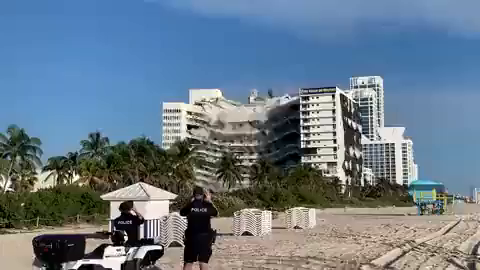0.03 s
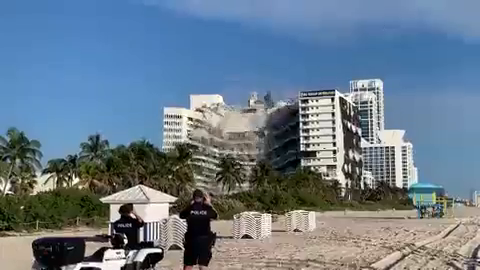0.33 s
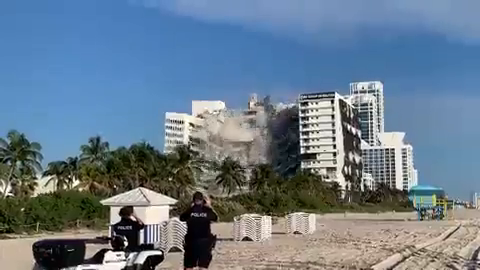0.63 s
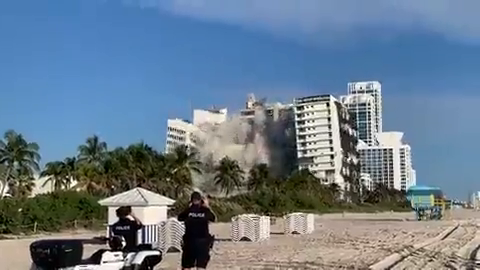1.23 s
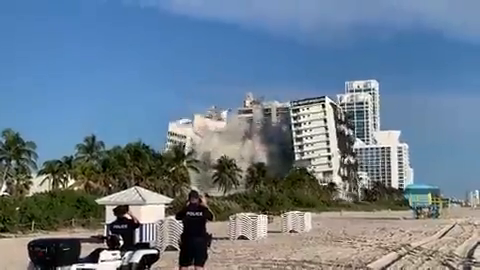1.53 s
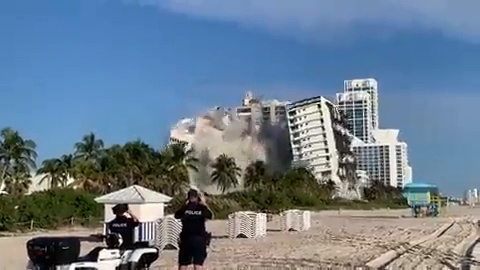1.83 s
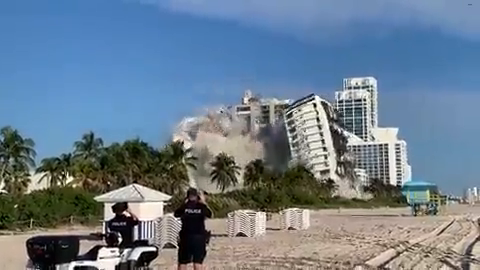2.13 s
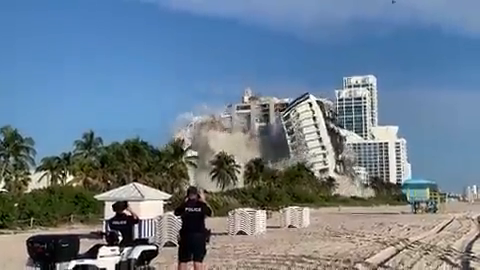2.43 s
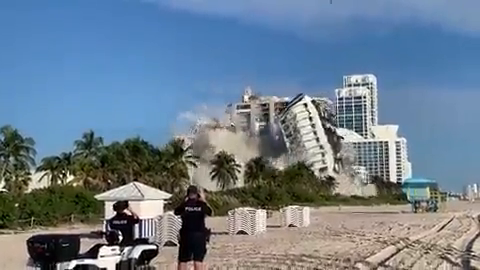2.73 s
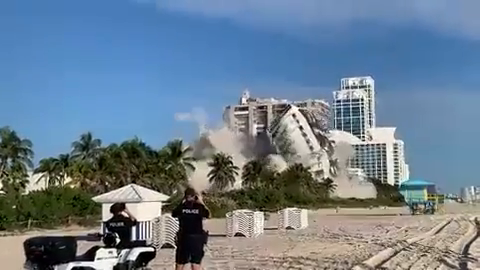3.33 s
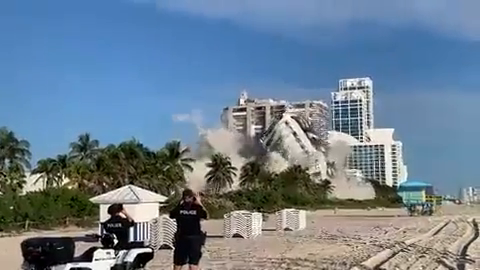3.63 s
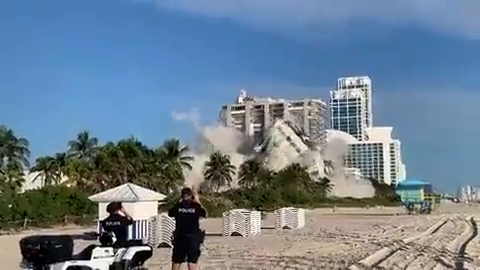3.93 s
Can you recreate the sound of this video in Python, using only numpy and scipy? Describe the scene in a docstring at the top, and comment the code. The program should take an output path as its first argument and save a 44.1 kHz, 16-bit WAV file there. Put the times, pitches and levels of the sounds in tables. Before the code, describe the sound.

A tall concrete building collapses, heard from a beach a few hundred metres away. Sharp cracks, crunching floors and heavy thuds cut through a roar of rubble, which then settles to a quiet rumble.

```python
"""Building collapse across a beach

A tall concrete building comes down a few hundred metres from a single microphone on the beach.
Countless rubble impacts merge into a roar, floors crunch and thud down, slabs knock on the heap and
members snap with sharp cracks. The path over the sand hollows out a few bands of the breaking and
falling debris; the fall then settles to a quiet rumble."""
import sys
import numpy as np
from scipy import signal
from scipy.fft import rfft, irfft
from scipy.io import wavfile
from scipy.ndimage import uniform_filter1d

SR = 44100
rng = np.random.default_rng(int(sys.argv[2]) if len(sys.argv) > 2 else 0)


def materialize(psi):
    """Save the field psi as 16-bit PCM at rate SR to the path in sys.argv[1].

    A 1-D psi becomes a single channel; in a 2-D psi each row is a channel.
    """
    bounded = np.clip(np.atleast_2d(psi).T, -1, 1)
    quanta = np.round(bounded * 32767).astype(np.int16)
    wavfile.write(sys.argv[1], SR, quanta)


N = 176400
TIME = np.arange(N) / SR


def undb(db):
    """Decibels to gain."""
    return 10 ** (np.asarray(db) / 20)


def unit(x):
    """Scale to rms 1."""
    return x / np.sqrt(np.mean(x ** 2))


def colour(x, *spectra, size=8192):
    """Causal filter of unit energy from one or more (f/Hz, level/dB) curves in series."""
    log_hz = np.log(np.maximum(np.arange(size // 2 + 1) * SR / size, 1))
    db = sum(np.interp(log_hz, np.log(s[:, 0]), s[:, 1]) for s in map(np.array, spectra))
    cepstrum = irfft(np.log(undb(db)))
    cepstrum[1:size // 2] *= 2  # fold to minimum phase
    cepstrum[size // 2 + 1:] = 0
    response = irfft(np.exp(rfft(cepstrum)))
    return signal.fftconvolve(x, response / np.linalg.norm(response))[:N]


def lowpass(x, hz):
    """Gentle first-order treble cut."""
    return signal.sosfilt(signal.butter(1, hz, fs=SR, output="sos"), x)


def wander(per_s):
    """Smooth random wander of rms 1."""
    hold = int(SR / per_s)
    steps = rng.standard_normal(N)[np.arange(N) // hold]
    return unit(uniform_filter1d(steps, hold))


def impacts(per_s, spread_db):
    """Randomly timed blows of rms 1; with no spread they are all the same size."""
    hits = rng.random(N) < per_s / SR
    sizes = undb(spread_db * np.minimum(rng.exponential(size=N), 4))
    return unit(hits * sizes * np.sign(rng.standard_normal(N)))


def burst(decay_s, size=22050):
    """Dying noise of unit energy."""
    x = rng.standard_normal(size) * np.exp(-np.arange(size) / SR / decay_s)
    return x / np.linalg.norm(x)


# Spectrum of the open air at the microphone: f/Hz, level/dB (levels in all tables are relative)
AIR_SPECTRUM = [(200,-6),(2500,-2.5),(4500,-5),(7000,-12.5),(9000,-32)]
def beach_air():
    """Faint steady hiss of the beach, under the fall."""
    return undb(-69) * colour(rng.standard_normal(N), AIR_SPECTRUM)


# Response of a few hundred metres of beach, building to microphone: f/Hz, level/dB
SAND_PATH = [(40,-39.5),(100,-11),(125,-24.5),(165,-7),(240,0.4),(300,-0.5),(370,-1),(490,-6.5),(560,-22),(620,-9.5),(675,-4.5),(790,-11.5),(885,-8),(1000,-11.5),(1080,-24),(1130,-15),(1230,-16.5),(1350,-12.5),(1600,-13),(1980,-16.5),(2170,-24.5),(2300,-15.5),(2450,-16.5),(2950,-21.5),(3600,-25),(4100,-28.5),(4450,-25.5),(4700,-34),(4950,-33),(5350,-39),(6550,-41),(7100,-42),(7650,-53),(8100,-45),(9500,-67.5)]
def over_sand(x, spectrum):
    """Give a source its own spectrum and the hollow bands of the path over the sand."""
    return colour(x, SAND_PATH, spectrum)


# Course of the fall from the beach: t/s, rumble level/dB, roar level/dB, clatter level/dB
FALL_LEVELS = [(0,-39.5,-15.5,-26),(.2,-31.5,-14.5,-32),(.39,-31,-14.5,-29.5),(.47,-29,-18,-41),(.6,-30,-18,-33.5),(.8,-34,-16,-31),(1.15,-32.5,-18.5,-32.5),(1.4,-32.5,-20,-30),(1.49,-36,-20.5,-35.5),(1.7,-32.5,-24,-32.5),(2.0,-39,-21,-31),(2.2,-45,-25.5,-35),(2.45,-41,-27,-36.5),(2.8,-51,-31.5,-47),(3.05,-52,-34.5,-53),(3.5,-56.5,-38,-48),(4,-52.5,-39,-51)]
def fall_gain(layer):
    """Gain over time of one layer as the building comes down and settles."""
    times, rumble_db, roar_db, clatter_db = np.array(FALL_LEVELS).T
    db = {"rumble": rumble_db, "roar": roar_db, "clatter": clatter_db}[layer]
    return undb(np.interp(TIME, times, db))


# Spectrum of the displaced air: f/Hz, level/dB
RUMBLE_SPECTRUM = [(15,-63.5),(25,-19.5),(45,-6),(62,3),(88,-7),(115,-20.5),(180,-39.5),(400,-84.5)]
def rumble():
    """The sinking mass pushes out air in a deep rumble."""
    return undb(5) * fall_gain("rumble") * unit(colour(rng.standard_normal(N), RUMBLE_SPECTRUM))


# Heavy masses landing: t/s, level/dB
LANDINGS = [(0.033,-28),(0.23,-9),(0.377,-14.5),(0.6,-14),(0.732,-14.5),(0.817,-13),(0.912,-10),(1.023,-20),(1.162,-18),(1.327,-21),(1.421,-16.5),(1.461,-21),(1.559,-16),(1.671,-16),(1.747,-19),(1.89,-18),(2.062,-14.5),(2.194,-22),(2.249,-19.5),(2.356,-24),(2.451,-29.5)]
def thuds(pitch_hz=65.4, width_s=0.013):
    """Each heavy landing sends out a short, low pressure pulse."""
    out = np.zeros(N)
    for middle, db in LANDINGS:
        hz = pitch_hz * (1 + 0.067 * rng.standard_normal())
        t = TIME - middle
        out += undb(db - 2.5) * np.exp(-(t / width_s) ** 2) * np.cos(2 * np.pi * hz * t)
    return out


# Slabs striking the heap: t/s, level/dB, low body level/dB
SLAB_HITS = [(.084,-26,7.5),(.168,-35,5),(0.223,-22.5,5.5),(.338,-27,6.5),(0.575,-21,7.5),(.668,-21.5,1.5),(0.763,-23,4.5),(0.91,-28,8),(1.044,-30,10.5),(1.152,-25,6),(1.171,-33,8),(1.267,-20,3),(1.283,-30,2),(1.408,-29,0),(1.532,-28.5,11.5),(1.578,-33,13),(1.73,-21,-10),(1.855,-35,12),(1.922,-19.5,4),(2.036,-27,0),(2.137,-27,5.5),(2.212,-32.5,8.5),(2.36,-31,8.5),(2.477,-30.5,4),(2.57,-28.5,-16),(2.704,-37,6.5),(3.178,-47.5,7),(3.288,-42,1),(3.529,-44,3)]
# Spectrum of a slab, before the sand: f/Hz, level/dB
SLAB_SPECTRUM = [(100,-2),(400,-3.5),(950,0.5),(1500,-3.5),(2200,-4.5),(4000,-15.5),(9000,-20)]
def slab_knocks(decay_s=0.021, body_hz=520):
    """A slab lands and crumbles: a dull, quickly dying run of blows; heavy slabs have more body."""
    force, body = np.zeros((2, N))
    for start, db, body_db in SLAB_HITS:
        landing = undb(db) * (TIME >= start) * np.exp(-np.maximum(TIME - start, 0) / decay_s)
        force += landing
        body += (undb(body_db) - 1) * landing
    blows = impacts(per_s=2200, spread_db=-1)
    return undb(2) * over_sand(force * blows + lowpass(body * blows, body_hz), SLAB_SPECTRUM)


# Floors breaking up: t/s, length/s, level/dB
FLOOR_FAILURES = [(0.151,0.049,-25),(0.24,0.042,-33),(0.35,0.047,-21.5),(0.483,0.039,-27),(0.533,0.065,-26.5),(0.641,0.022,-24.5),(0.722,0.052,-29.5),(0.826,0.024,-32),(0.9,0.024,-36),(1.088,0.047,-32.5),(1.25,0.069,-23),(1.409,0.017,-24.5),(1.521,0.022,-28.5),(1.905,0.025,-25),(2.026,0.019,-36),(2.34,0.017,-41)]
# Spectrum of their fragments, before the sand: f/Hz, level/dB
FRAGMENT_SPECTRUM = [(100,1),(400,1),(1200,0),(3000,3),(9000,8)]
def floor_crunches(attack_s=0.0019, release_s=0.015):
    """Each failing floor lets go a dense shower of fragments."""
    force = np.zeros(N)
    for start, length, db in FLOOR_FAILURES:
        rise = np.clip((TIME - start) / attack_s, 0, 1)
        fade = np.exp(-np.maximum(TIME - start - length, 0) / release_s)
        force += undb(db) * rise * fade
    return undb(1) * over_sand(force * impacts(per_s=1000, spread_db=0), FRAGMENT_SPECTRUM)


# Members snapping: t/s, level/dB, low body level/dB, splintering decay/s
MEMBER_SNAPS = [(0.01,-19,6,0.0025),(.024,-13,-5.5,.002),(0.056,-20,-10,.002),(.091,-18.5,2.5,.003),(0.146,-18.5,3.5,.003),(.162,-14,0,.003),(0.224,-12.5,0.5,0.0062),(.259,-19.5,-4.5,.002),(0.323,-18.5,6,0.0033),(.356,-20.5,6,0.0036),(.381,-19.5,1,.003),(.495,-23,-3,0.003),(0.544,-12.5,-3.5,0.0021),(.646,-15.5,6,0.0063),(.733,-12,-10,0.0036),(.751,-18,-4,.002),(.812,-11,-7.5,0.0031),(.836,-16.5,-5,.002),(.849,-25,-10,0.0022),(.907,-14.5,5.5,0.0051),(.923,-27.5,4,.002),(.957,-17,-11,0.0023),(1.008,-23,6,0.0022),(1.1,-27,11.5,.003),(1.243,-17.5,1.5,.002),(1.258,-22,0,0.0017),(1.276,-15.5,-15,0.0036),(1.295,-20,-3,0.0026),(1.31,-23.5,-3,0.0017),(1.41,-22,6,.005),(1.53,-13.5,2,0.0064),(1.536,-15.5,-3,0.0042),(1.592,-22.5,2,.003),(1.682,-25.5,1.5,0.0024),(1.72,-19.5,0,0.0055),(2.029,-17,2.5,0.0044),(2.042,-23.5,5,0.0043),(2.166,-17,-17,0.0035),(2.198,-31,-8,.002),(2.215,-18,-16,.004),(2.347,-17,-3.5,0.0036),(2.428,-35,7,0.0022),(2.569,-33.5,7,.004)]
# Spectrum of a snap, before the sand: f/Hz, level/dB
SNAP_SPECTRUM = [(100,-5),(500,-2),(1200,2),(3000,4),(5000,3),(9000,5.5)]
def member_cracks(ring_hz=3200, ring_q=5.8, highest_hz=9550, body_hz=1680):
    """A member snaps: a shock, splintering, a short tail and a brief ring; thin ones have less body."""
    out = np.zeros(2 * N)
    for start, db, body_db, splinter_s in MEMBER_SNAPS:
        snap = undb(3) * burst(splinter_s) + undb(-6) * burst(decay_s=0.008)
        snap[0] += 1  # the shock
        own_hz = min(ring_hz * np.exp(0.36 * rng.standard_normal()), highest_hz)
        snap += undb(-1) * signal.lfilter(*signal.iirpeak(own_hz, ring_q, fs=SR), snap)
        snap += (undb(body_db) - 1) * lowpass(snap, body_hz)
        onset = int(start * SR)
        out[onset:onset + len(snap)] += undb(db + 14.5) * snap
    return over_sand(out[:N], SNAP_SPECTRUM)


# Spectrum of big rubble, before the sand: f/Hz, level/dB
ROAR_SPECTRUM = [(100,0),(400,-1),(900,-2),(1600,-5.5),(3000,-5.5),(5000,-9.5),(9000,-26.5)]
# Spectrum of small rubble, before the sand: f/Hz, level/dB
CLATTER_SPECTRUM = [(100,-25),(500,-6.5),(900,1),(1400,-1),(2500,1),(5000,-0.5),(9000,5)]
def rubble(surge_db=1.26, settle_start_s=0.86, settle_length_s=0.74):
    """Big pieces roar and small ones clatter, surging together as the rubble falls unevenly."""
    surge = undb(surge_db * wander(per_s=26))
    big = unit(over_sand(impacts(per_s=3500, spread_db=1.5), ROAR_SPECTRUM))
    small = unit(over_sand(impacts(per_s=1100, spread_db=1), CLATTER_SPECTRUM))
    roar = undb(-3) * fall_gain("roar") * big
    clatter = undb(1.5) * fall_gain("clatter") * small
    # later debris lands dully in the heap
    dull_share = 0.92 * np.clip((TIME - settle_start_s) / settle_length_s, 0, 1)
    return surge * (roar + (1 - dull_share) * clatter + dull_share * lowpass(clatter, hz=2380))


def tower_echo(sound):
    """The towers scatter sound back across the beach."""
    return undb(-20) * signal.fftconvolve(sound, burst(decay_s=0.08))[:N]


def near_reflections(sound, above_hz=1180):
    """Early reflections of the treble, close to the microphone."""
    treble = signal.sosfilt(signal.butter(2, above_hz, "high", fs=SR, output="sos"), sound)
    return undb(-12) * signal.fftconvolve(treble, burst(decay_s=0.004))[:N]


def scene():
    """The collapse in mono from the beach; only its sharp sounds echo off the towers."""
    sharp = member_cracks() + floor_crunches() + slab_knocks()
    sound = sharp + tower_echo(sharp) + rumble() + thuds() + rubble() + beach_air()
    return (sound + near_reflections(sound))[None]


def record(dry):
    """The recorder cuts the top steeply above 9550 Hz."""
    return signal.sosfilt(signal.ellip(10, .2, 80, 9550, fs=SR, output="sos"), dry)


dry = scene()
out = record(dry)
materialize(out)
```